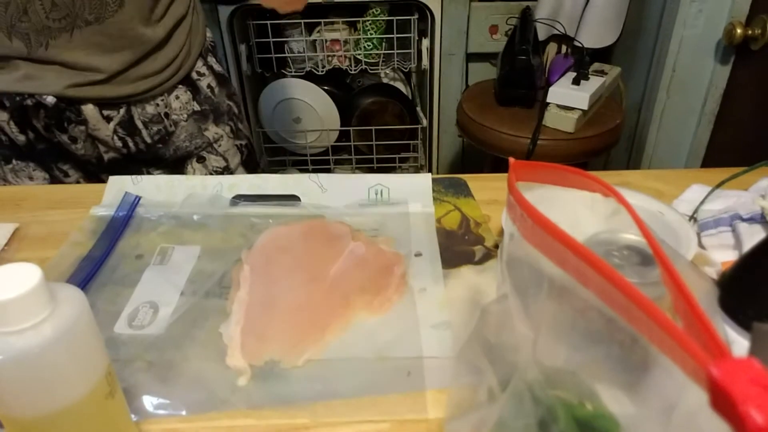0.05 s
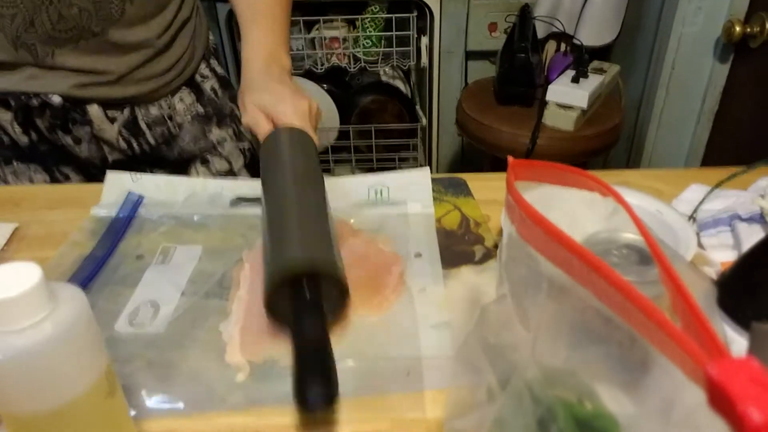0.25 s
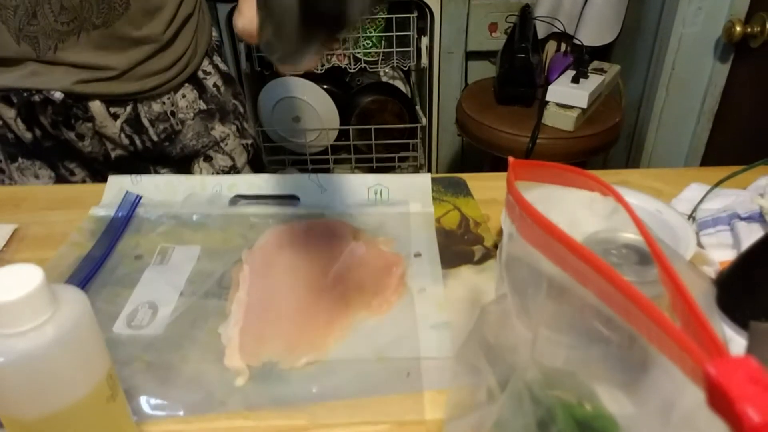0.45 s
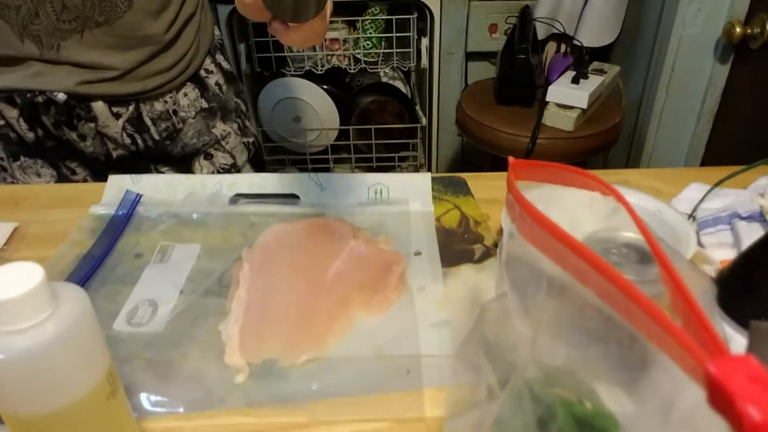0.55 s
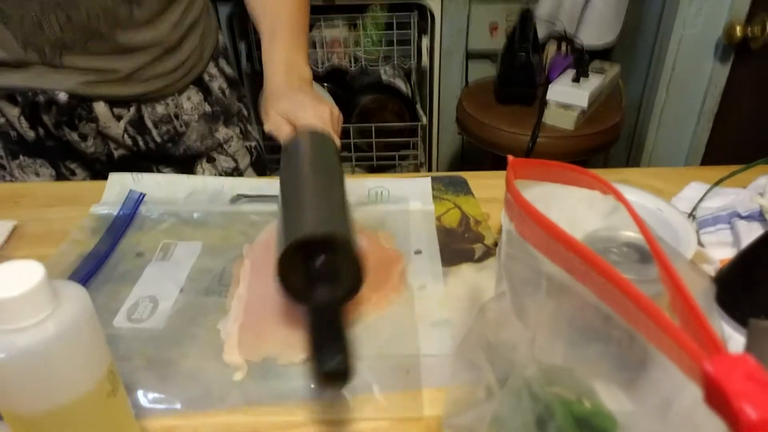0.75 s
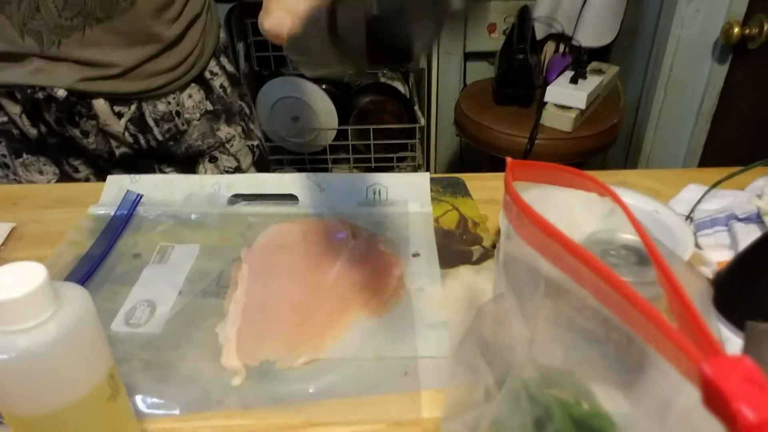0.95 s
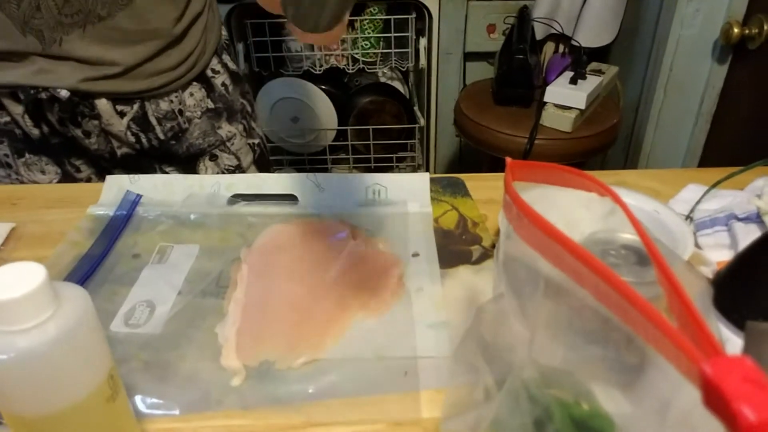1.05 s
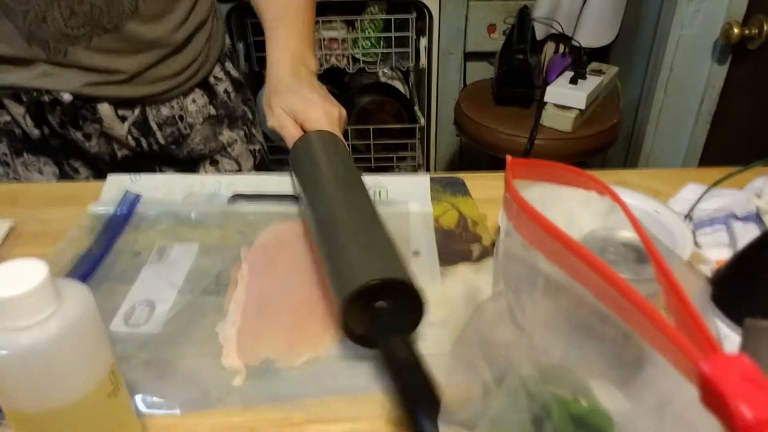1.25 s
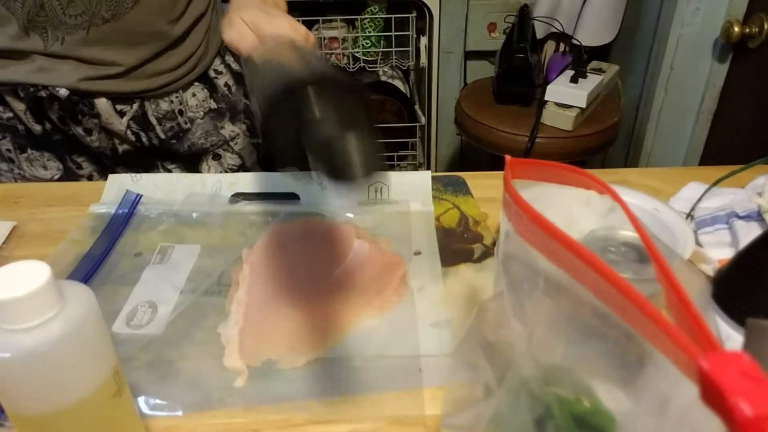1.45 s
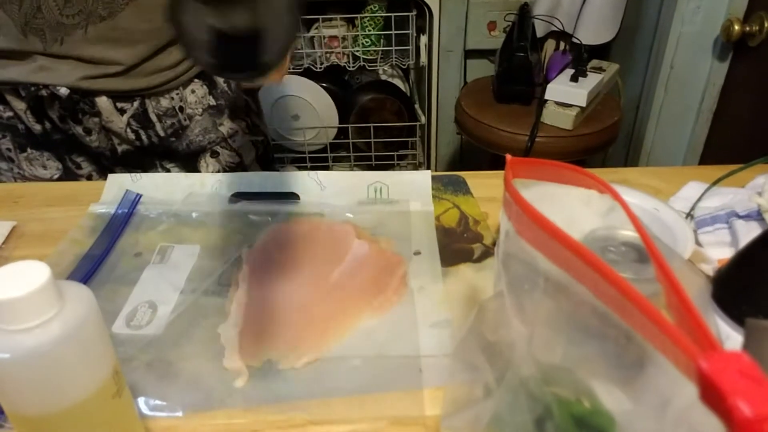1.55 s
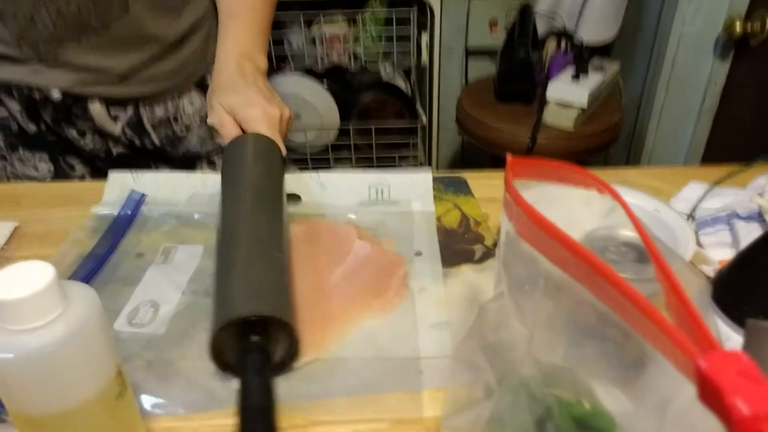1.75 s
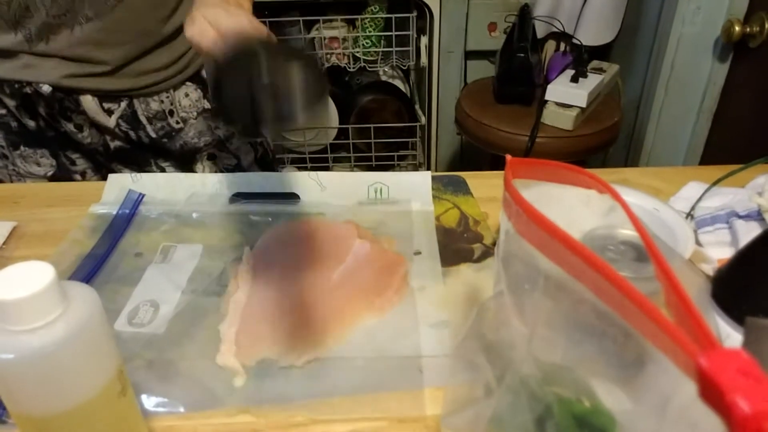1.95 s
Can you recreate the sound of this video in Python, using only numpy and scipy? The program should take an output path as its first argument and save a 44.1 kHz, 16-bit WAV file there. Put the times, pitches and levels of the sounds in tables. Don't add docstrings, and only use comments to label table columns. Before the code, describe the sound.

A rolling pin hits raw meat in a plastic bag four times, about twice a second, each a deep counter thud with a wet slap and board rattle; close microphone, small hard kitchen, low appliance hum.

```python
import sys
import numpy as np
from scipy import signal
from scipy.fft import rfft, irfft
from scipy.io import wavfile
from scipy.ndimage import uniform_filter1d

SR = 44100
rng = np.random.default_rng(int(sys.argv[2]) if len(sys.argv) > 2 else 0)


def nominal_scale(level):
    x = np.asarray(level, float) / 20
    return 10 ** x


def store_wav(level_fs):
    pcm = np.round(np.clip(np.atleast_2d(level_fs), -1, 1) * 32767)
    wavfile.write(sys.argv[1], SR, pcm.T.astype(np.int16))


N = 88200
T = np.arange(N) / SR
F = np.maximum(np.arange(N // 2 + 1) * SR / N, 1)

# start in seconds [s], thud level [dB], extra level of the counter modes
# near 150 Hz [dB], slap level [dB], bag crackle level [dB].
BLOWS = [
    (.218, 0, 1.5, -18, -42),
    (0.6966, -3.5, -5.5, -16, -47.5),
    (1.185, -0.5, -3.5, -11.5, -36.5),
    (1.666, -3, 4.5, -21, -41.5),
]
# centre [Hz], width [Hz], level [dB],
# time the meat gives way [s].
LANDING = [
    (3200, 1500, -4, .0036),
    (540, 120, 0, .0046),
    (570, 150, -6, .0033),
    (3000, 1500, -3, .0036),
]
# start in seconds [s], level [dB].
BOUNCES = [
    (.244, -31),
    (0.711, -28),
    (1.202, -24),
    (1.706, -27.5),
]
# frequency [Hz], level [dB], decay T60 [s], signed side of the nodal line.
COUNTER_MODES = [(55.6, -20.5, 0.37, 0.87), (82.7, -13.5, 0.37, -0.87), (100.2, 4.5, 0.1, 0.82),
                 (139.7, -2, .1, 1), (154.8, -6, 0.18, -0.9), (159.4, -25.5, .5, 1), (176.4, -9.5, 0.22, 1),
                 (215, -6, 0.072, 0.96), (243.5, -15.5, 0.35, 1), (247.5, -6.5, 0.3, 0.63),
                 (298, 0, .07, -0.52), (320, -10, .25, 1), (382, -7, 0.12, -0.57)]
# frequency [Hz], level [dB], decay T60 [s].
BOARD_MODES = [(401.4, -13, 0.1), (507, -8, .12), (577, 11, 0.046), (654.3, -4, .08), (774.6, -6, .1),
               (836, -2, 0.035), (979, -2.5, 0.21), (1190, -7.5, 0.087), (1285, -7, 0.12),
               (1600, -7.5, 0.11), (1670, -2, 0.11), (1940, -17, .1), (2934, -15.5, .07), (4140, -16, 0.29)]
# frequency [Hz], level [dB].
SLAP_COLOUR = [(150, -11.5), (400, 6.5), (900, 6), (1700, 1.5), (2100, -4.5), (3300, -10.5), (5000, -20),
               (8000, -29)]
# frequency [Hz], level [dB].
FILM_COLOUR = [(2000, -0.5), (5000, 5), (8000, 5), (10000, 5.5), (13000, 9.5), (16000, 6)]
# centre [Hz], width [Hz], level [dB].
FOLDS = [(3624, 1300, -5.5), (9600, 660, -1.5), (12200, 830, -7.5), (12700, 1100, 4.5), (14800, 1600, 1)]
# centre in seconds [s], width [s], level [dB].
RUSTLES = [
    (.075, 0.017, -75),
    (0.113, 0.022, -62),
    (.15, .02, -82.5),
    (0.598, 0.044, -75.5),
    (0.652, 0.029, -73.5),
    (1.139, 0.03, -66),
    (1.6, 0.005, -66.5),
    (1.635, 0.021, -61.5),
]
# start in seconds [s], level [dB], frequency [Hz].
POPS = [(.052, -67.5, 8700), (.101, -64, 10000), (0.157, -64, 9400), (.203, -60.5, 5170),
        (.554, -63, 11800), (.585, -58, 7000), (.599, -56, 6000), (.641, -57, 11000), (1.622, -56, 14000),
        (1.725, -47, 11000), (.6865, -49.5, 1810), (0.694, -48, 2500), (1.431, -67.5, 12000)]
# start in seconds [s], length [s], frequency [Hz], level [dB].
SQUEAKS = [
    (.113, .055, 6570, -72),
    (.099, .03, 9300, -71),
    (1.579, .032, 3480, -71),
    (1.705, .03, 6500, -53),
    (1.72, .03, 4130, -45),
    (1.625, .04, 9800, -72),
]
# frequency [Hz], decay T60 [s].
ROOM_T60 = [(60, 0.46), (250, 0.32), (1000, 0.31), (3000, 0.33), (8000, .28), (15000, 0.35)]
# frequency [Hz], side level [dB].
WIDTH = [(60, -20.5), (125, -22), (250, -10.5), (500, -7), (1000, -1), (2500, 0.5), (12000, -0.5)]
# frequency [Hz], level [dB].
HUM_COLOUR = [(25, 11), (60, 0), (110, 0.5), (180, 4), (400, -6.5), (800, -15.5), (2200, -20),
              (6000, -45.5)]
# centre [Hz], width [Hz], level [dB].
DRONES = [(155, 4.7, -81.5), (200, 2.7, -77.5), (206, 3.3, -89.5), (292, 3.3, -72.5), (1620, 280, -85)]

PUSH_S, SQUEEZE, PLACE_DB = .0028, .45, 1.5
SLAP_RISE_S, SLAP_T60_S, KNOCK_T60_S, BOUNCE_T60_S = 0.0046, 0.19, 0.038, .12
CRACKLE_RISE_S, CRACKLE_T60_S = .0012, .2
SNAP_DB, SNAP_T60_S = 17, .011
POP_RISE_S, POP_T60_S = .0003, .022
ROUGH_SLAP_DB, ROUGH_BAG_DB, PATCHY_DB = 1.5, .8, 3.0
ROOM_DB, ROOM_BUILD_S, ROOM_LOW_HZ = -11.5, 0.0052, 167
HUM_DB, HISS_DB, PAN_DB = -66, -85.5, -1.5
MIC_LOW_HZ, TOP_HZ, CLIP = 60, 15800, 1.09


def curve(table):
    a = np.array(table, float)
    return np.interp(np.log(F), np.log(a[:, 0]), a[:, 1])


def unit(x):
    return x / np.sqrt(np.mean(x ** 2))


def noise(colour):
    return unit(irfft(rfft(rng.standard_normal(N)) * nominal_scale(curve(colour)), N))


def band(x, hz, width):
    return irfft(rfft(x) / (1 + 1j * (F / width - hz * hz / (F * width))), N)


def ring(x, hz, t60):
    return signal.lfilter([1], [1, -np.exp(2j * np.pi * hz / SR - np.log(1000) / (t60 * SR))], x).real


def fade(t0, rise, t60):
    u = np.maximum(T - t0, 0)
    return (1 - np.exp(-(u / rise) ** 2)) * nominal_scale(-60 * u / t60)


def grains(spread_db):
    steps = np.repeat(rng.exponential(size=N // 40 + 1), 40)[:N]
    return unit(uniform_filter1d(nominal_scale(spread_db * steps), size=30))


def spread(mid, side):
    side = irfft(rfft(side) * nominal_scale(curve(WIDTH)), N)
    return np.array([mid + side, mid - side])


def hum():
    white = rng.standard_normal(N)
    drone = sum(nominal_scale(db) * unit(band(white, hz, width)) for hz, width, db in DRONES)
    hiss = np.diff(rng.standard_normal((2, N + 1)))
    return nominal_scale(HUM_DB) * spread(noise(HUM_COLOUR), noise(HUM_COLOUR)) + drone + nominal_scale(HISS_DB) * hiss


def patches():
    return nominal_scale(PATCHY_DB * unit(uniform_filter1d(rng.standard_normal(N), size=900)))


def bag():
    film = noise(FILM_COLOUR) * grains(ROUGH_BAG_DB)
    crackle = 0
    for t0, _, _, _, db in BLOWS:
        snap = nominal_scale(SNAP_DB) * fade(t0, CRACKLE_RISE_S, SNAP_T60_S)
        crackle = crackle + nominal_scale(db) * (fade(t0, CRACKLE_RISE_S, CRACKLE_T60_S) + snap)
    white = rng.standard_normal(N)
    folds = sum(nominal_scale(db) * patches() * band(white, hz, width) for hz, width, db in FOLDS)
    folds = unit(folds + nominal_scale(-9) * film)
    swing = sum(nominal_scale(db) * np.exp(-((T - t0) / width) ** 2) for t0, width, db in RUSTLES)
    pops = 0
    for t0, db, hz in POPS:
        pops = pops + nominal_scale(db) * unit(band(white, hz, hz * .9)) * fade(t0, POP_RISE_S, POP_T60_S)
    return film * crackle + folds * swing + pops


def squeaks():
    wobble = 1 + .8 * unit(uniform_filter1d(rng.standard_normal(N), size=200))
    out = 0
    for t0, length, hz, db in SQUEAKS:
        swell = np.sin(np.pi * np.clip((T - t0) / length, 0, 1) ** .6)
        out = out + nominal_scale(db) * wobble * np.sin(2 * np.pi * hz * T) * swell
    return out


def bump(t0, length):
    return np.sin(np.pi * np.clip((T - t0) / length, 0, 1)) ** 2 * 2 / (length * SR)


def thud():
    out = 0
    place = PLACE_DB * rng.standard_normal((len(BLOWS), len(COUNTER_MODES)))
    for (t0, db, boom_db, *_), place_db, (*_, sink) in zip(BLOWS, place, LANDING):
        push = bump(t0 + sink, PUSH_S) - SQUEEZE * bump(t0, sink + PUSH_S / 2)
        for k, (hz, mode_db, t60, side) in enumerate(COUNTER_MODES):
            level = db + mode_db + place_db[k] + boom_db * (k in (3, 4))
            out = out + nominal_scale(level) * side * ring(push, hz, t60) / 2
    return out


def slap():
    wet = spread(noise(SLAP_COLOUR), noise(SLAP_COLOUR)) * grains(ROUGH_SLAP_DB)
    knock = spread(*rng.standard_normal((2, N)))
    out = 0
    for (t0, _, _, db, _), (land_hz, width, land_db, _) in zip(BLOWS, LANDING):
        drive = knock * fade(t0, SLAP_RISE_S, KNOCK_T60_S)
        board = sum(nominal_scale(mode_db) * ring(drive, hz, t60) for hz, mode_db, t60 in BOARD_MODES) / 30
        landed = wet + nominal_scale(land_db) * 2 * band(wet, land_hz, width)
        out = out + nominal_scale(db) * (landed * fade(t0, SLAP_RISE_S, SLAP_T60_S) + board)
    settling = sum(nominal_scale(db) * fade(t0, SLAP_RISE_S, BOUNCE_T60_S) for t0, db in BOUNCES)
    return out + wet * settling


def kitchen(x):
    x = signal.lfilter(*signal.butter(2, ROOM_LOW_HZ, "high", fs=SR), x)
    tails, t60 = [], curve(ROOM_T60)
    for _ in range(2):
        spectrum, echo = rfft(rng.standard_normal(N)), 0
        for hz in 31 * 2 ** np.arange(0, 10.):
            octave = np.cos(np.pi / 2 * np.clip(np.log2(F / hz), -1, 1)) ** 2
            echo = echo + irfft(spectrum * octave, N) * fade(0, ROOM_BUILD_S, np.interp(hz, F, t60))
        tails.append(signal.fftconvolve(x, echo / np.sqrt(np.sum(echo ** 2)))[:N])
    return spread(*tails)


def scene():
    direct = thud() + slap() + spread(bag(), bag())
    near = direct + nominal_scale(ROOM_DB) * kitchen(direct[0]) + squeaks()
    pan = nominal_scale(np.array([[PAN_DB], [-PAN_DB]]) / 2)
    return near * pan + hum()


def roll_off(x):
    return signal.sosfilt(signal.butter(12, 16490, fs=SR, output="sos"), x)


def record(dry):
    x = signal.sosfilt(signal.butter(2, MIC_LOW_HZ, "high", fs=SR, output="sos"), dry)
    rounded = np.tanh(CLIP * x) / np.tanh(CLIP)
    mix = signal.sosfilt(signal.ellip(8, .2, 60, TOP_HZ, fs=SR, output="sos"), rounded)
    return roll_off(mix)


dry = scene()
out = record(dry)
store_wav(out)
```